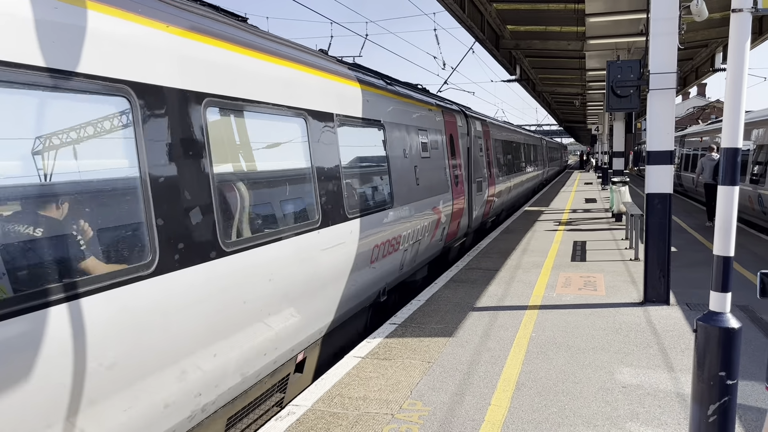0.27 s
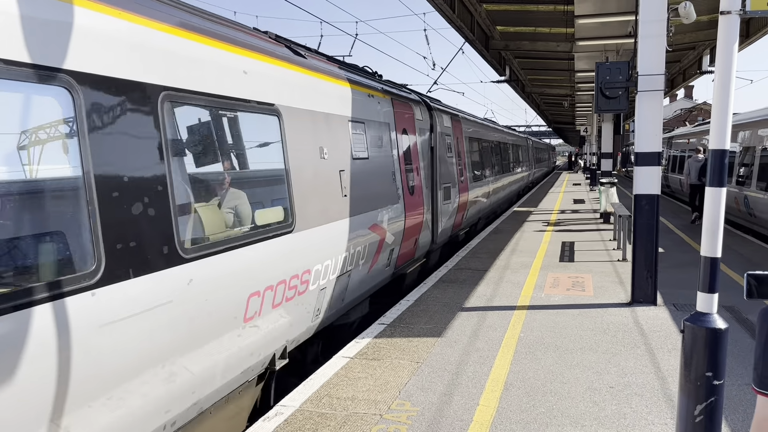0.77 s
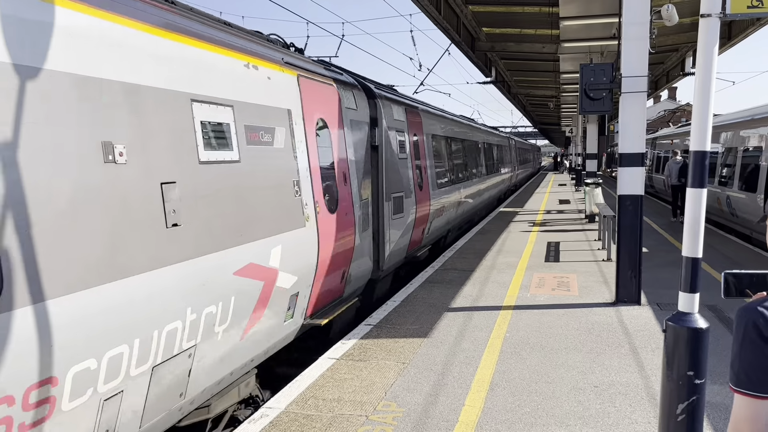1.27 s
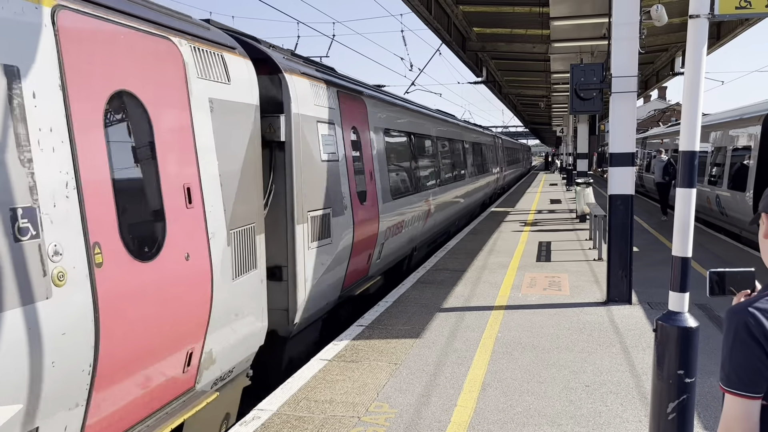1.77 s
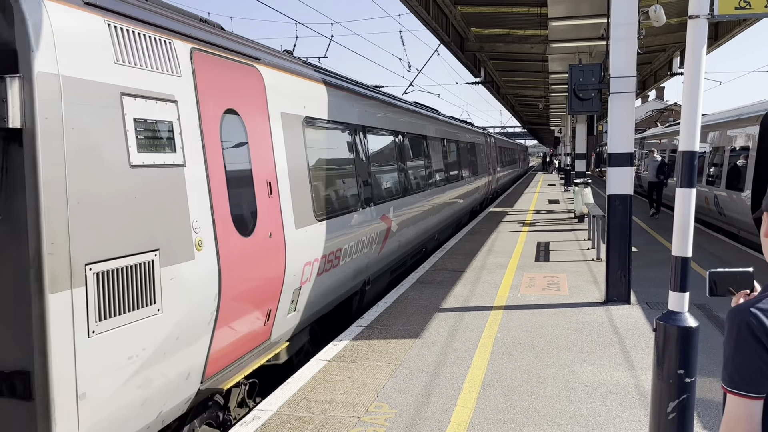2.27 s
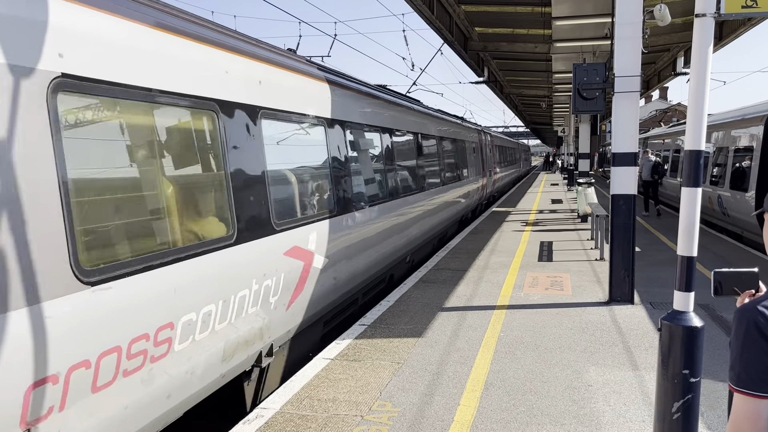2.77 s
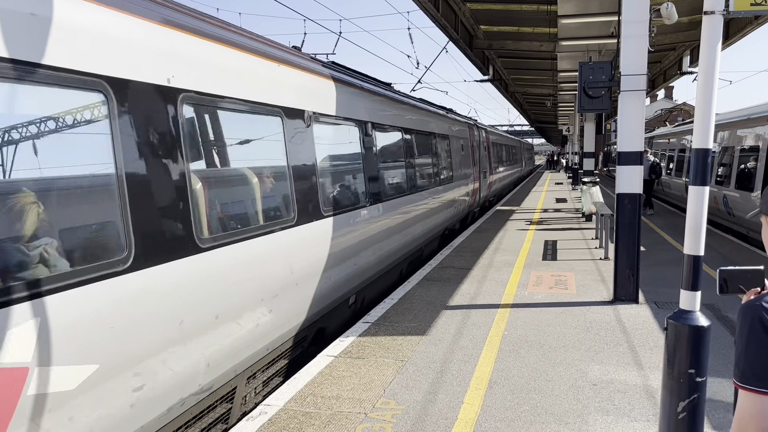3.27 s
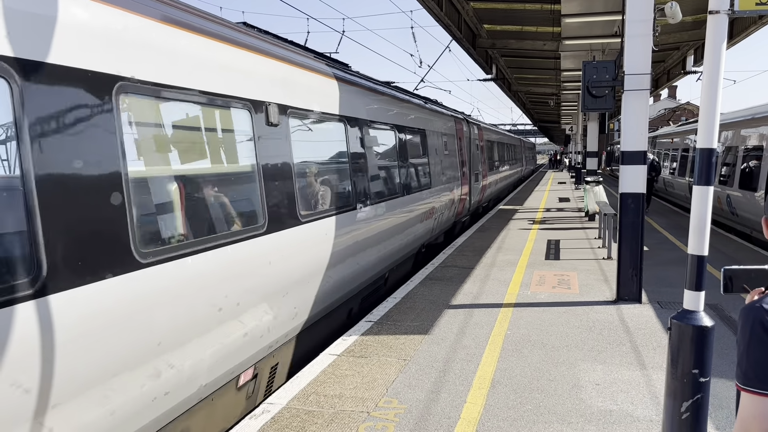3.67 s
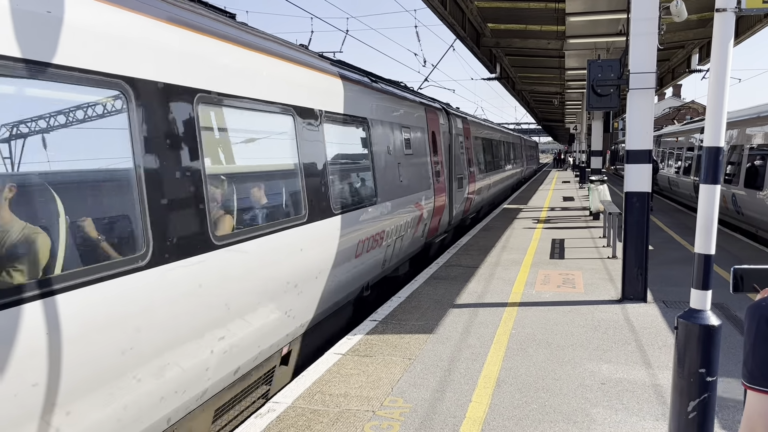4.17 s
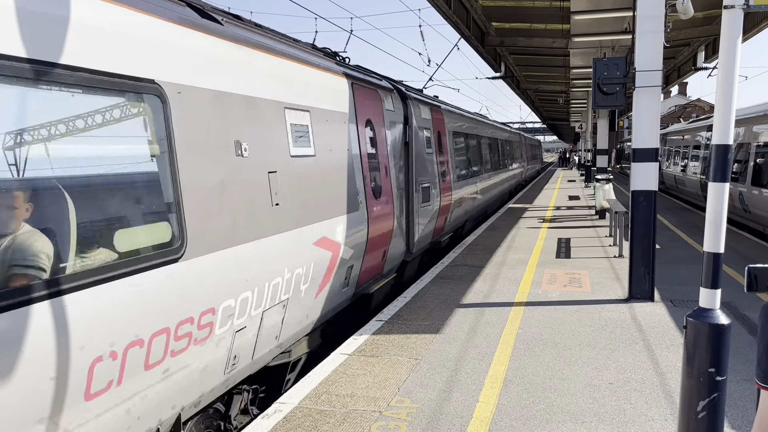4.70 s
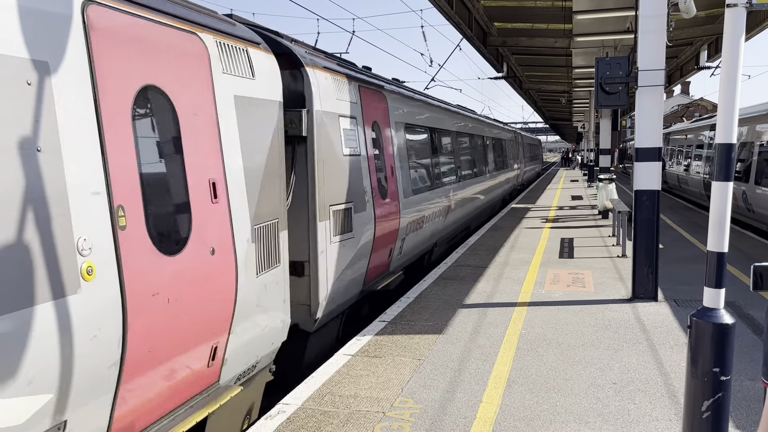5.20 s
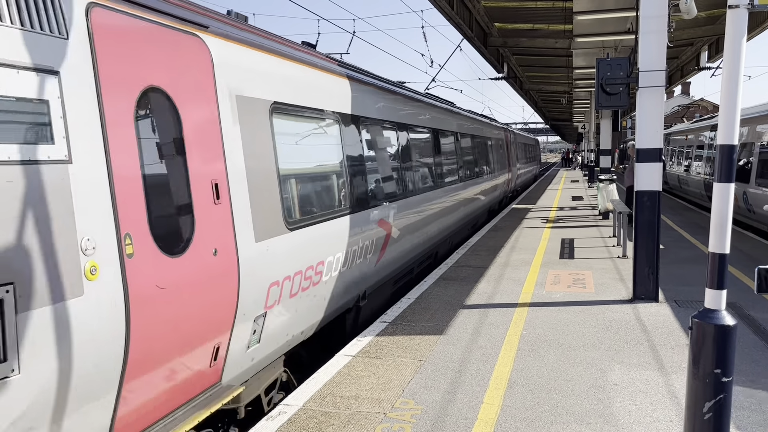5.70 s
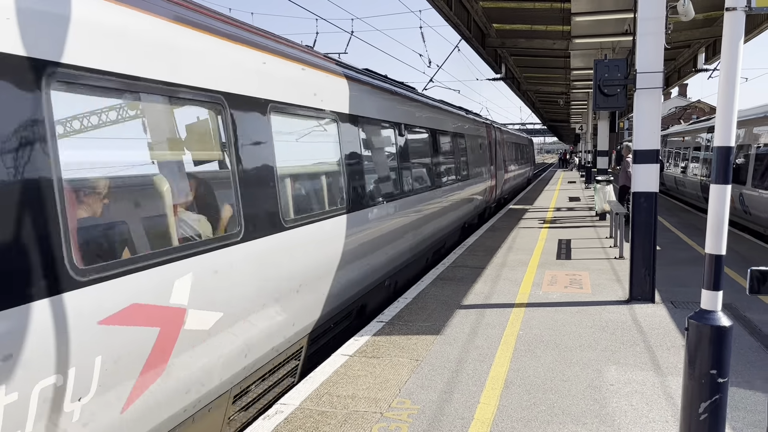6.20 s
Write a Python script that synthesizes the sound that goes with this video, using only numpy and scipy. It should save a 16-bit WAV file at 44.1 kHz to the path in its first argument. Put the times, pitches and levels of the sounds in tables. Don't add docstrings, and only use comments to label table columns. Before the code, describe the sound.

Diesel train pulls away close by on a roofed platform, low engine drone swelling twice under a broad roar, with thin turbo whistle and fan whine.

```python
import sys
import numpy as np
from scipy import signal
from scipy.fft import rfft, irfft, next_fast_len
from scipy.io import wavfile

SR = 44100
rng = np.random.default_rng(int(sys.argv[2]) if len(sys.argv) > 2 else 0)


def wav_out(sig):
    wavfile.write(sys.argv[1], SR, np.round(np.clip(np.atleast_2d(sig).T, -1, 1) * 32767).astype(np.int16))


def boost_factor(decibels):
    exponent = np.asarray(decibels, float) / 20
    return 10 ** exponent


N = 284445
T = np.arange(N) / SR

# t/s, speed/(rev/s)
CRANK_SPEED = [(0, 27.5), (.5, 27.6), (1.05, 28), (1.7, 28.15), (2.1, 28.3), (2.4, 28.8), (2.75, 29.9),
               (3, 30.6), (3.4, 31), (4.1, 31.1), (4.6, 31.1), (5.3, 30.6), (5.6, 30.2), (6.45, 29.9)]
EXHAUST_ABREAST = [
    .9,
    4.9,
]
FIRING_ORDERS, UNEVEN_ORDERS = (3, 6, 9), (4, 5, 7, 8)
# first level/dB, second level/dB, lag/s, reach/s
FIRING_PASS = [(-12.5, -21, -0.33, 1.01), (-8.5, -17, 0.066, 0.39), (-16, -33, 0.11, 0.64)]
# first level/dB, second level/dB, lag/s, reach/s
UNEVEN_PASS = [(-35.5, -29, -.7, 0.29), (-23.5, -20.5, 0.9, 0.26), (-26, -24, -0.86, 0.89),
               (-33.5, -18, 0.13, 0.26)]
# order, level/dB
FAINT_ORDERS = [(2.5, -18.5), (4.5, -14.5), (5.5, -29), (6.5, -20.5), (7.5, -9), (8.5, -12.5), (10, -11.5),
                (11, -22.5)]
# t/s, half length/s, level/dB
THIRD_FADES = [
    (1.46, 0.25, -6.0),
    (2.19, 0.044, -9.5),
    (2.33, 0.38, -13),
    (2.68, 0.033, -24.5),
    (3.35, 0.4, -13),
    (4.09, 0.088, -3.5),
    (4.66, 0.22, -22),
    (5.56, 0.07, -21.5),
    (5.81, 0.1, -16.5),
    (6.2, 0.06, -5.5),
]
# t/s, half length/s, level/dB
SIXTH_FADES = [
    (0.286, 0.076, -16.5),
    (0.765, 0.18, -16),
    (2.68, 0.09, -7),
    (2.966, 0.1, -33),
    (3.494, 0.18, -24),
    (4.314, 0.24, -5.5),
    (4.72, 0.02, -13.5),
    (5, 0.11, -9.5),
    (5.93, 0.043, -7),
    (6.45, 0.29, -5.5),
]
# t/s, half length/s, level/dB
NINTH_FADES = [
    (0.133, 0.083, -9.5),
    (1.423, 0.056, -19),
    (2.332, 0.091, -15),
    (3.054, 0.38, -21.5),
    (3.69, 0.14, -30.5),
    (4.26, 0.098, -12),
    (4.816, 0.17, -3),
    (5.633, 0.17, -13.5),
    (6.292, 0.31, -13.5),
]
# t/s, half length/s, level/dB
UNEVEN_FADES = [
    [(.61, 0.1, -18), (4.18, .21, -35), (5.25, 0.22, 18), (3.5, 0.11, 13.5)],
    [(.93, 0.73, -8.5), (2.84, .27, -3), (4.4, 0.13, -11), (5., .2, 7.5), (6., .5, -15)],
    [(.31, 0.53, -18), (1., 0.032, -15.5), (2.3, 0.24, 1.5), (3.48, 0.38, -16.5), (4.36, 0.33, -18.5),
     (6.4, .13, -15)],
    [(.25, 0.093, -15), (1.9, .07, -8), (2.8, .15, 7), (3.98, 0.15, -22), (4.96, .13, -13.5),
     (5.44, .11, -45)],
]
# t/s, f/Hz, level/dB
TURBO_NEAR = [(1.2, 6500, -80), (2, 6800, -66), (3, 7180, -59), (3.6, 7400, -52), (4.3, 7620, -43.5),
              (4.8, 7780, -46), (5.2, 8000, -47), (5.6, 8280, -44.5), (6, 8470, -43), (6.3, 8580, -39),
              (6.45, 8620, -40)]
# t/s, f/Hz, level/dB
TURBO_GONE = [(0, 5450, -62), (.5, 5650, -57), (1.2, 5950, -56), (2, 6250, -63), (3, 6500, -68),
              (3.8, 6700, -82)]
# f/Hz, level with a bay near/dB, share of bay swing, width/Hz
STEADY_FANS = [(1728, -49, .8, 60), (2715, -53, .65, 16)]
# t/s, f/Hz, level/dB, reach/s, width/Hz
PASSING_PARTS = [(4.39, 1292, -36, .1, 6), (4.4, 1284, -49, 1.1, 14), (4.45, 1735, -46, .6, 40),
                 (.3, 2312, -46, .5, 30), (1.5, 1175, -52, .3, 20), (5.85, 2712, -51, .4, 16),
                 (1.1, 2712, -51.5, .45, 18), (3.2, 1930, -53, .15, 14), (1.2, 5410, -62, 1.8, 90),
                 (.2, 277, -25, .25, 1.5), (.83, 278.4, -25, .3, 1.5), (1.8, 278.5, -35, .5, 1.5),
                 (1.2, 335, -31, .35, 3), (3., 1285, -51, .6, 25)]
# t/s, f/Hz, level/dB, reach/s, width/Hz
RUSHES = [
    (1., 3040, -41, .4, 470),
    (4.7, 3200, -42, .35, 520),
    (.6, 8750, -52, .55, 490),
    (3.8, 2700, -47, .35, 700),
    (5.8, 3800, -46, .8, 1000),
    (4.4, 45.6, -40, 2.5, 5),
    (2.7, 1480, -50, .9, 150),
    (0, 45.6, -44, .8, 5),
    (5.5, 5800, -50, .6, 1000),
    (4.35, 12300, -60, .35, 600),
]
# t/s, level/dB
BAYS = [(0.0, -52), (0.79, -52), (1.13, -56), (1.74, -64), (2.21, -65), (2.8, -63), (3.3, -61.5),
        (4.4, -52.5), (5.23, -57.5), (5.71, -59), (6.31, -55), (6.45, -52)]
# level with both near/dB, share of bay swing, share of exhaust swing
NOISE_LAYERS = [(-31.5, 0.043, 1), (-30, 0.65, 0.45), (-42.5, 0.42, 0.031), (-49, 1, 0.054)]
LAYER_CENTRES = [200, 800, 3300, 9000]
# f/Hz, level/(dB per Hz)
NOISE_COLOUR = [(25, -46.5), (60, -15), (110, -16), (200, -9), (300, -19), (380, -20.5), (800, -28.5),
                (1500, -29), (3300, -35), (4200, -34.5), (6500, -35), (9000, -34), (12000, -41),
                (15500, -44)]
# f/Hz, likeness 0-1, left lead/rad, left minus right level/dB
PORTS = [(50, .995, .08, .1), (90, .993, .15, 0), (170, .975, .4, 0), (270, .95, .45, .5),
         (450, .68, 1., 2), (800, .55, 1.8, 3), (1200, .45, 2.2, 1), (1550, .7, 3.2, -3), (1760, .8, .6, 1),
         (2200, .5, 1.3, 2.5), (3500, .55, .5, 1.5), (4700, .08, .3, 1), (6000, .3, -.8, .5),
         (7400, .8, -2.1, .5), (8050, .93, -2.9, 0), (8400, .96, -3.14, 0), (8900, .93, -3.4, 0),
         (9600, .7, -4.3, 0), (11800, .9, -6.28, 0), (13600, .55, -7.9, .5), (15000, .9, -9.4, 0)]
# low f/Hz, high f/Hz, until t/s
SUM_LOST = [
    (7700, 8050, 3.6),
    (8050, 8330, 4.7),
    (8330, 8950, 6.02),
    (14500, 20000, 9),
]
# low f/Hz, high f/Hz, until t/s
DIFFERENCE_LOST = [(11050, 13100, 9)]


def engines():
    rev, = in_time(CRANK_SPEED)
    fades = THIRD_FADES, SIXTH_FADES, NINTH_FADES
    firing = [exhaust(*row) + faded(dips) for row, dips in zip(FIRING_PASS, fades)]
    out = sum(line(k * rev, db, wander=.2, rate=1.5) for k, db in zip(FIRING_ORDERS, firing))
    out = out + line(12 * rev, firing[1] - 22, wander=.5, rate=4.5)
    for order, row, dips in zip(UNEVEN_ORDERS, UNEVEN_PASS, UNEVEN_FADES):
        flutter_db = 2 * drift(1.63, count=1)
        out = out + line(order * rev, exhaust(*row) + faded(dips) + flutter_db, wander=.3, rate=2.)
    rumble_db = layer_levels()[0]
    for order, db in FAINT_ORDERS:
        level_db = rumble_db + 8 + db + 2.5 * drift(1., count=1)
        out = out + line(order * rev, level_db, wander=.96, rate=4.)
    return out


def exhaust(first_db, second_db, lag_s, reach_s):
    passes = zip(EXHAUST_ABREAST, (first_db, second_db))
    return 10 * np.log10(sum(boost_factor(2 * (db + abreast(s + lag_s, reach_s))) for s, db in passes))


def faded(fades):
    return sum(db * np.exp(-((T - s) / half_s) ** 2) for s, half_s, db in fades)


def turbochargers():
    overtone = np.array(TURBO_NEAR) * [1, 2, 1] - [0, 0, 16]
    near = boost_factor(1.5) * whistle(TURBO_NEAR, width_hz=190) + whistle(overtone[:7], width_hz=350)
    return near + whistle(TURBO_GONE, width_hz=140)


def whistle(rows, width_hz):
    fade_s = .16
    inside_s = np.minimum(T - rows[0][0], rows[-1][0] - T)
    gate = np.clip(inside_s / fade_s + 1, 0, 1)
    return gate * narrow(*in_time(rows), width_hz)


def passing_parts():
    out = 0
    for s, hz, db, reach_s, width_hz in PASSING_PARTS + RUSHES:
        pitch = hz * (1 - .006 * np.tanh(T - s))
        level_db = db + 2 * abreast(s, reach_s)
        if width_hz < 10 and hz > 100:
            out = out + line(pitch, level_db, wander=.48, rate=width_hz)
        else:
            out = out + narrow(pitch, level_db, width_hz)
    return out


def steady_fans():
    bay_db = bay_swing()
    return sum(narrow(hz, db + share * bay_db, width) for hz, db, share, width in STEADY_FANS)


def roar():
    patchy_db = 1.04
    size = next_fast_len(N)
    octave = np.log2(np.fft.rfftfreq(size, 1 / SR) + 1)
    hz, colour_db = np.transpose(NOISE_COLOUR)
    white = rfft(rng.standard_normal((2, size))) * np.sqrt(SR / 2)
    noise = white * boost_factor(np.interp(octave, np.log2(hz), colour_db))
    levels, shared, out = layer_levels(), drift(3.7, count=1), 0
    for centre in np.arange(4.5, 14.6, .5):
        shape = np.cos(np.pi * np.clip(octave - centre, -.5, .5)) ** 2
        place = np.interp(centre, np.log2(LAYER_CENTRES), np.arange(4))
        low = min(int(place), 2)
        level_db = levels[low] + (place - low) * (levels[low + 1] - levels[low])
        flicker = .27 * shared + drift(12.0, count=1)
        out = out + boost_factor(level_db + patchy_db * flicker) * irfft(noise * shape, size)[:, :N]
    return out


def layer_levels():
    bay_db = bay_swing()
    exhaust_db = exhaust(0, -1.85, lag_s=.052, reach_s=.85)
    return np.array([db + bay * bay_db + pipe * exhaust_db for db, bay, pipe in NOISE_LAYERS])


def bay_swing():
    return in_time(BAYS)[0] + 52.5


def abreast(at_s, reach_s):
    return -10 * np.log10(1 + ((T - at_s) / reach_s) ** 2)


def line(hz, level_db, wander, rate):
    start = 1 + 2 * np.pi * rng.random() * np.array([[0], [1]])
    turn = 2 * np.pi * np.cumsum(hz) / SR + start
    roaming = wander * drift(rate) * [[1], [9.]]
    return np.sqrt(2) * boost_factor(level_db) * np.cos(turn + roaming)


def narrow(hz, level_db, width_hz):
    turn = 2 * np.pi * np.cumsum(hz + 0 * T) / SR
    slow = drift(width_hz, count=4)
    return boost_factor(level_db) * (slow[:2] * np.cos(turn) + slow[2:] * np.sin(turn))


def drift(rate, count=2):
    step = int(np.clip(SR / rate / 40, 16, 400))
    size = next_fast_len(N // step + 2)
    hz = np.fft.rfftfreq(size, step / SR)
    slow = irfft(rfft(rng.standard_normal((count, size))) / (1 + (hz / rate) ** 2), size)
    slow = slow / slow.std(axis=1, keepdims=True)
    return np.array([np.interp(T, np.arange(size) * step / SR, s) for s in slow])


def in_time(rows):
    s, *columns = np.transpose(rows)
    return [np.interp(T, s, c) for c in columns]


def ports(pair):
    size = next_fast_len(N + 4096)
    octave = np.log2(np.fft.rfftfreq(size, 1 / SR) + 1)
    hz, *columns = np.transpose(PORTS)
    alike, lead, balance_db = [np.interp(octave, np.log2(hz), c) for c in columns]
    alike = np.clip(alike, 0, 1)
    direct, scattered = rfft(pair, size)
    right = alike * np.exp(-1j * lead) * direct + np.sqrt(1 - alike ** 2) * scattered
    both = np.array([direct * boost_factor(balance_db / 2), right * boost_factor(-balance_db / 2)])
    return irfft(both, size)[:, :N]


def scene():
    whines = turbochargers() + passing_parts() + steady_fans()
    return ports(engines() + whines + roar())


def thinned(pair):
    total = without(pair[0] + pair[1], SUM_LOST)
    difference = without(pair[0] - pair[1], DIFFERENCE_LOST)
    return np.array([total + difference, total - difference]) / 2


def without(sound, lost):
    size = next_fast_len(N + 4096)
    hz, spectrum = np.fft.rfftfreq(size, 1 / SR), rfft(sound, size)
    for low, high, until_s in lost:
        ragged = np.repeat(rng.standard_normal(N // 1024 + 2) ** 3, 1024)[118:][:N]
        muted = until_s + .45 * ragged > T
        band = irfft(spectrum * ((hz > low) & (hz <= high)), size)[:N]
        sound = sound - muted * band
    return sound


def low_pass(x):
    return signal.sosfilt(signal.butter(12, 15790, fs=SR, output="sos"), x)


def record(dry):
    bass_cut = signal.butter(2, 33, "high", fs=SR, output="sos")
    heard = signal.sosfilt(bass_cut, dry * np.clip(T / .003, 0, 1))
    limited = heard / (1 + (heard / .97) ** 4) ** .25
    mix = thinned(limited)
    return low_pass(mix)


dry = scene()
out = record(dry)
wav_out(out)
```